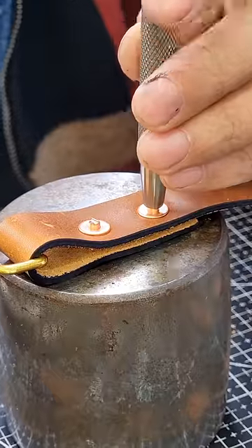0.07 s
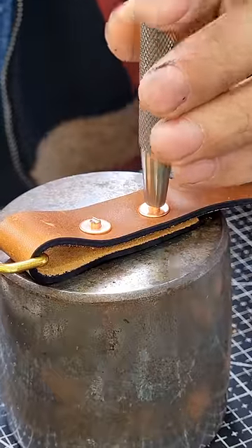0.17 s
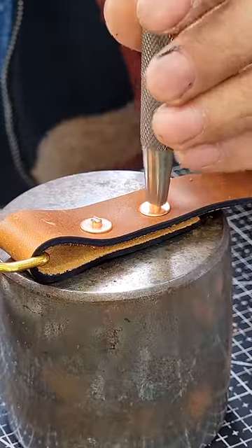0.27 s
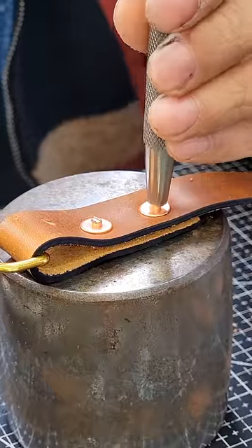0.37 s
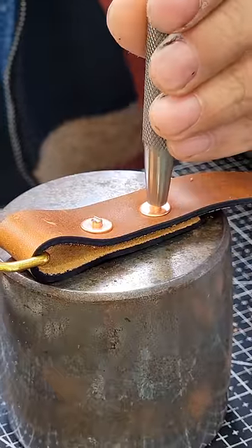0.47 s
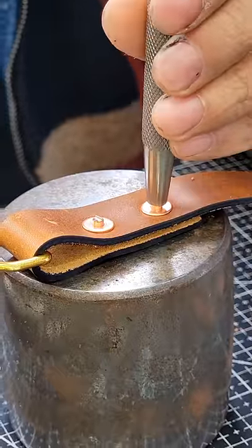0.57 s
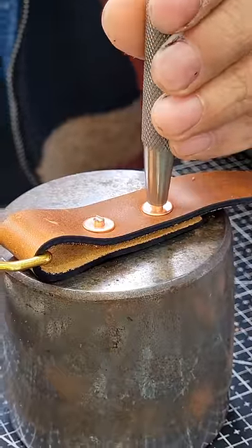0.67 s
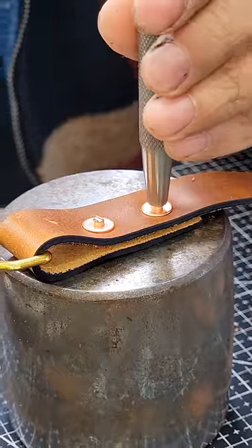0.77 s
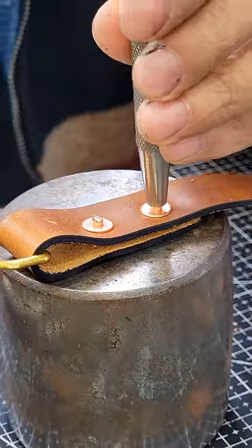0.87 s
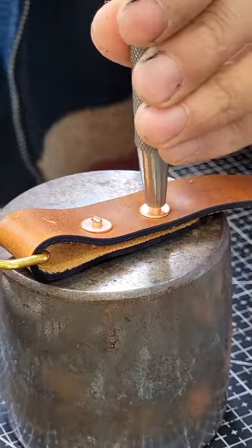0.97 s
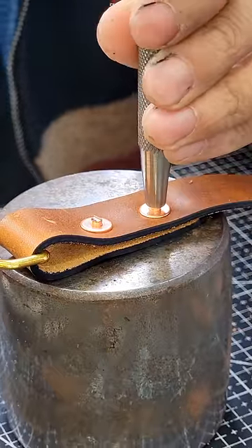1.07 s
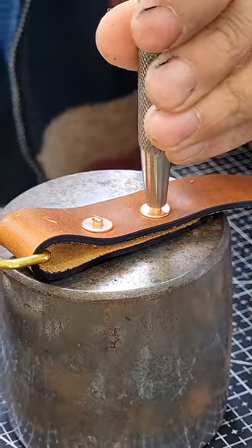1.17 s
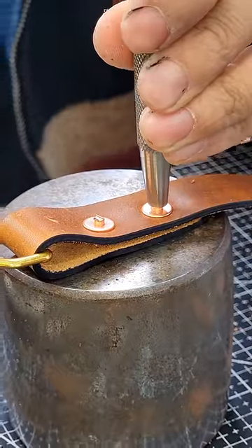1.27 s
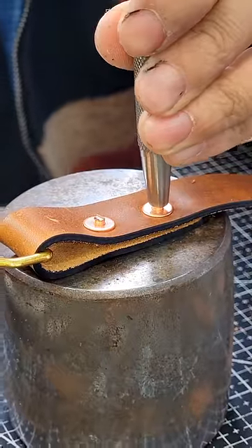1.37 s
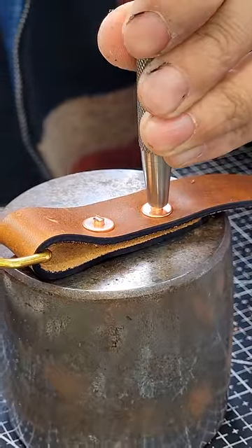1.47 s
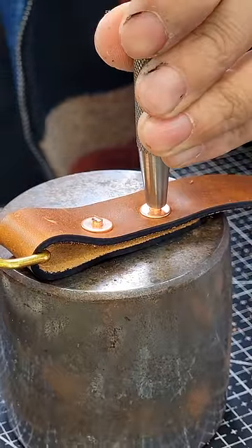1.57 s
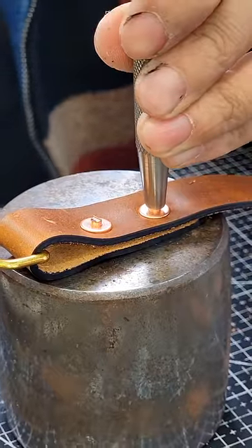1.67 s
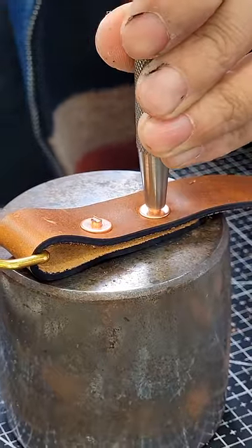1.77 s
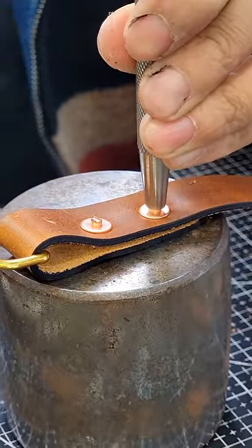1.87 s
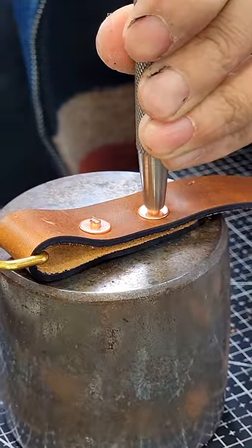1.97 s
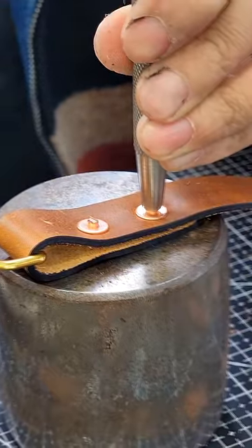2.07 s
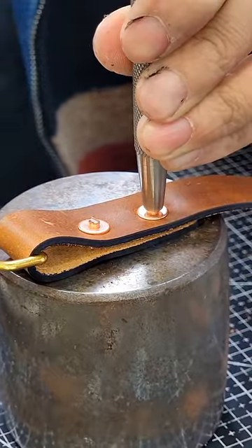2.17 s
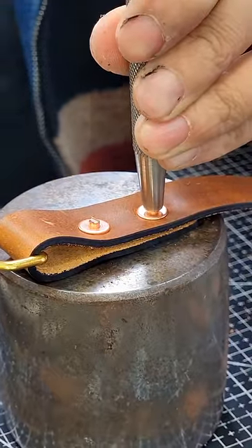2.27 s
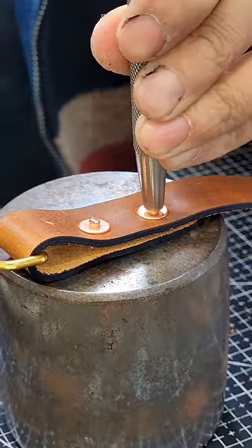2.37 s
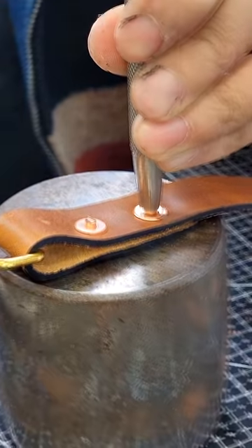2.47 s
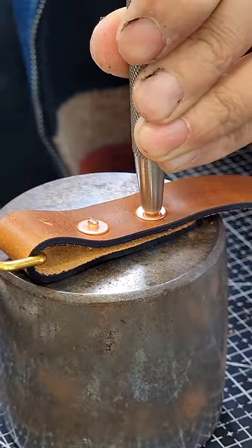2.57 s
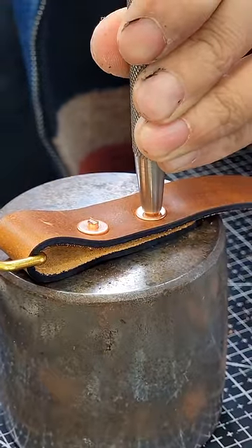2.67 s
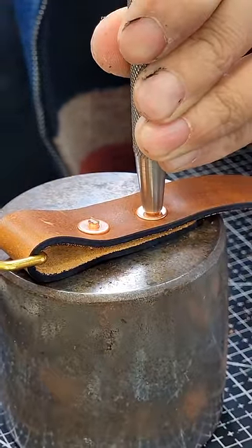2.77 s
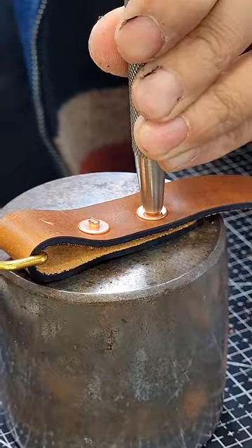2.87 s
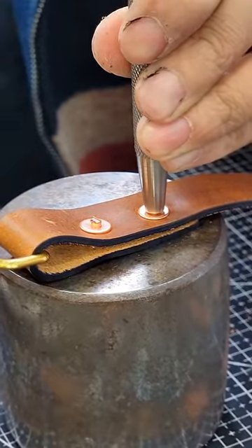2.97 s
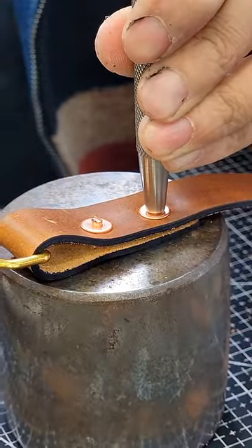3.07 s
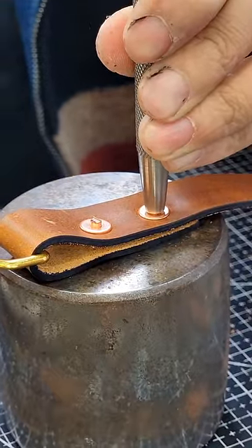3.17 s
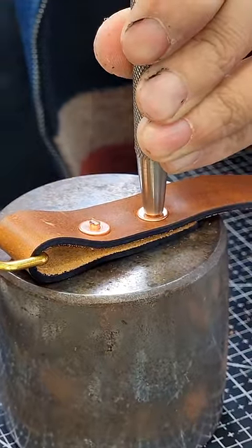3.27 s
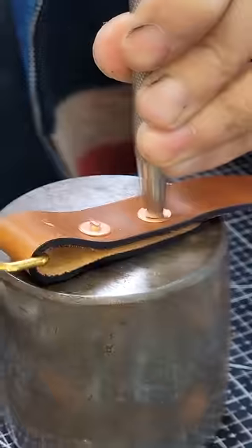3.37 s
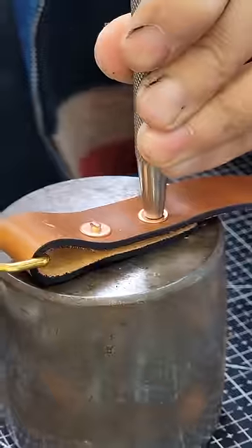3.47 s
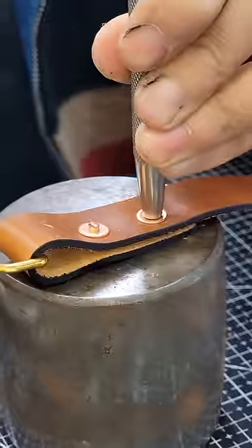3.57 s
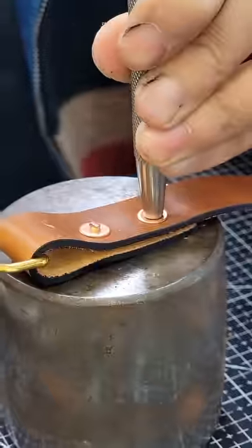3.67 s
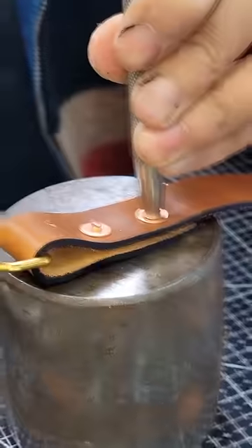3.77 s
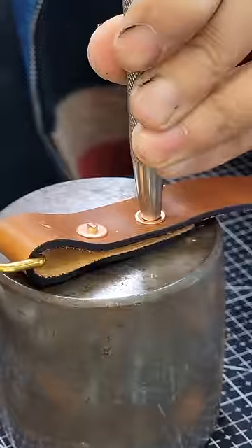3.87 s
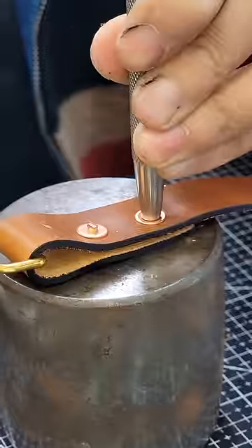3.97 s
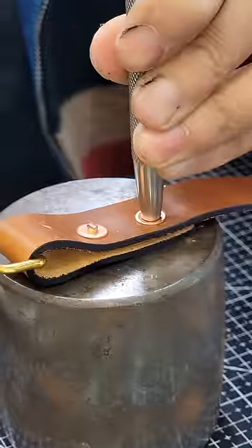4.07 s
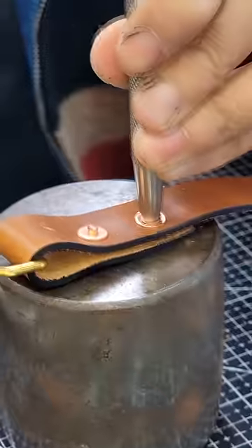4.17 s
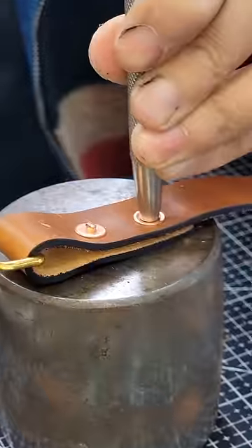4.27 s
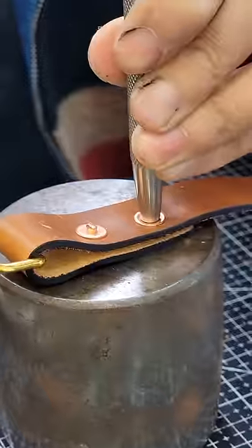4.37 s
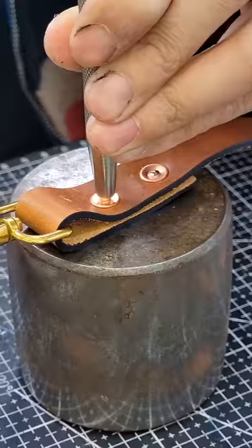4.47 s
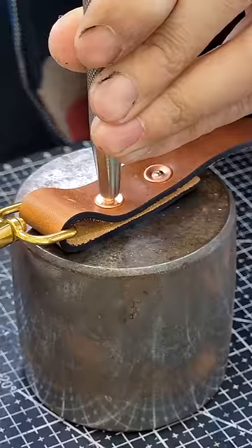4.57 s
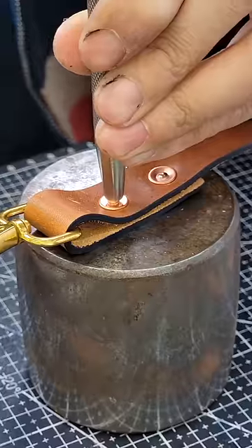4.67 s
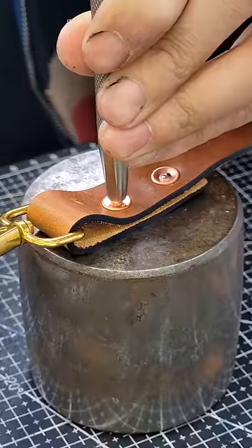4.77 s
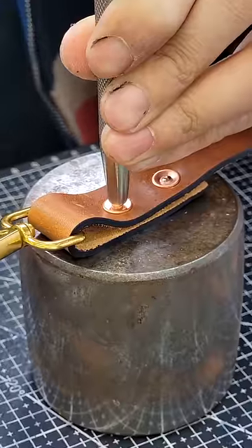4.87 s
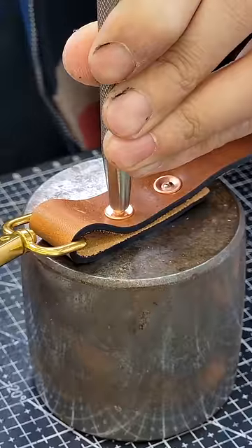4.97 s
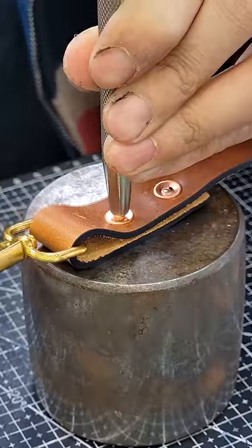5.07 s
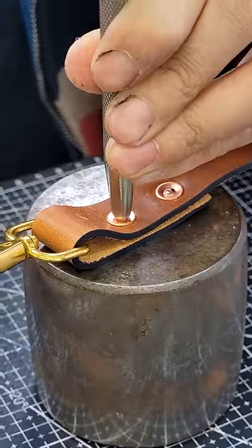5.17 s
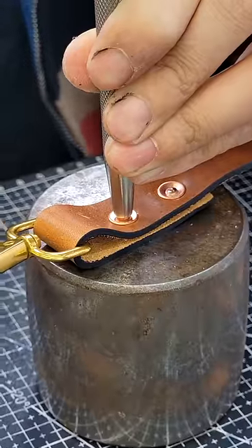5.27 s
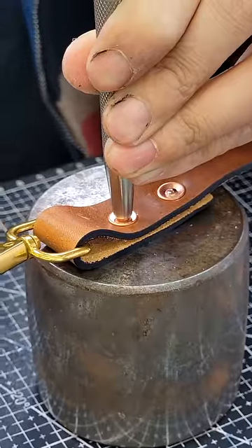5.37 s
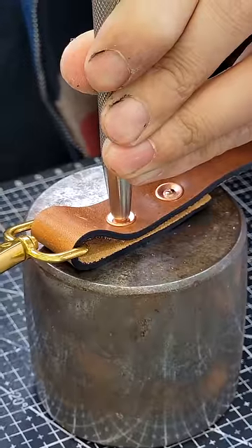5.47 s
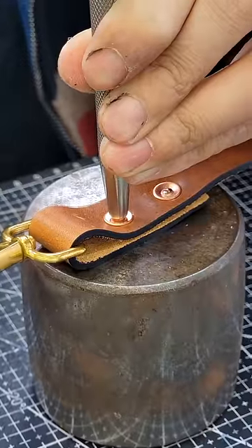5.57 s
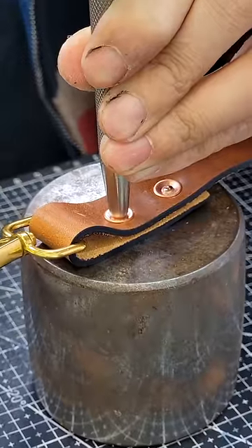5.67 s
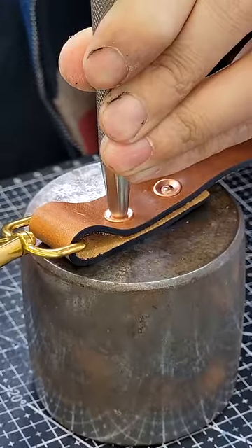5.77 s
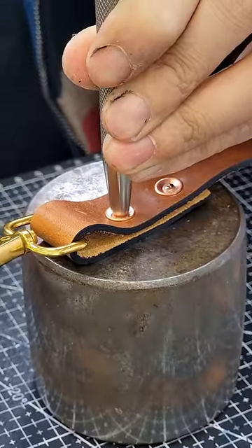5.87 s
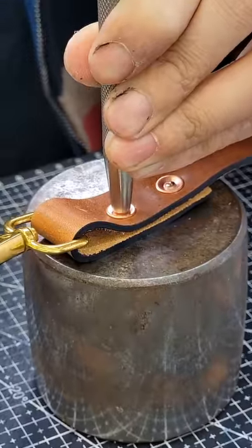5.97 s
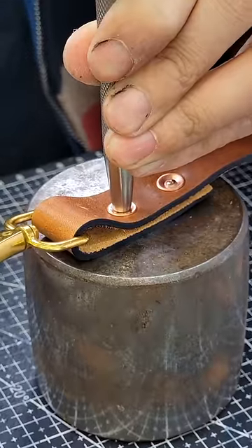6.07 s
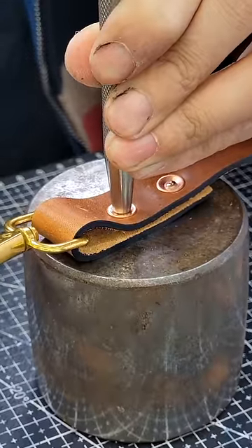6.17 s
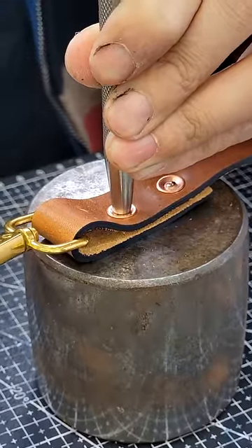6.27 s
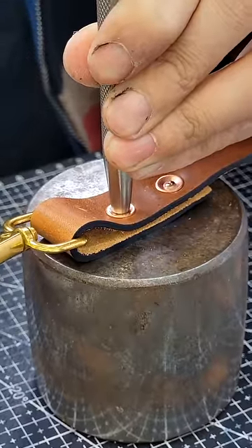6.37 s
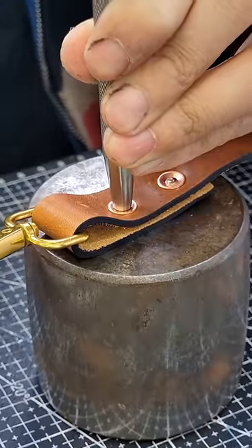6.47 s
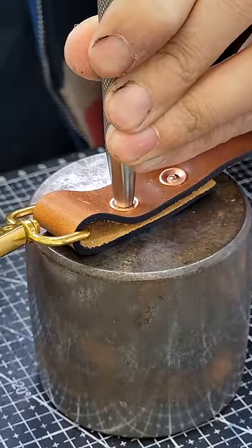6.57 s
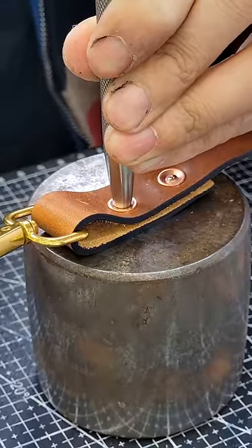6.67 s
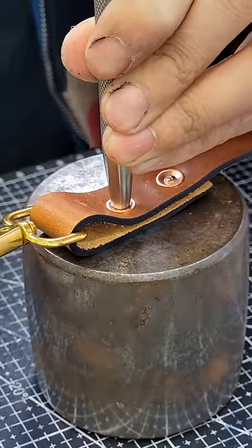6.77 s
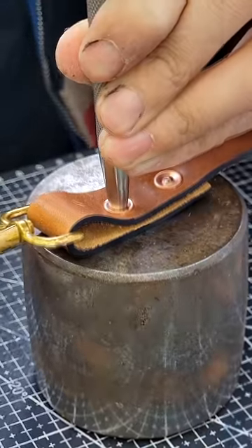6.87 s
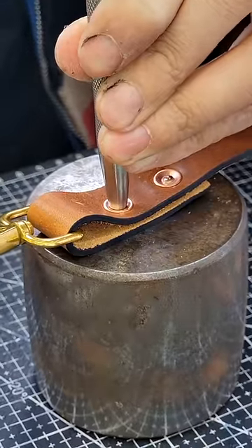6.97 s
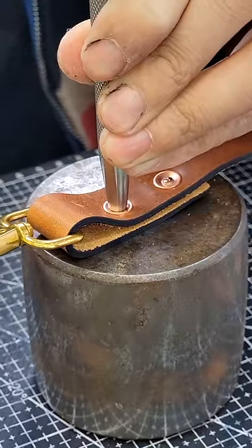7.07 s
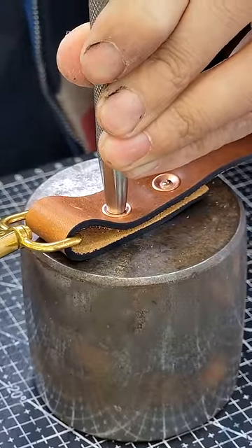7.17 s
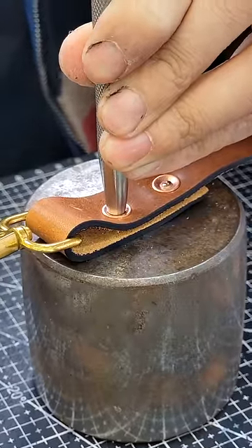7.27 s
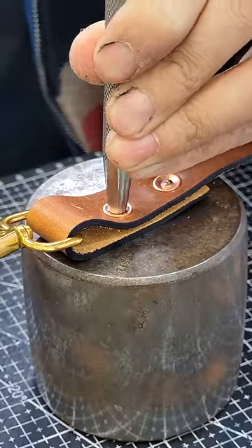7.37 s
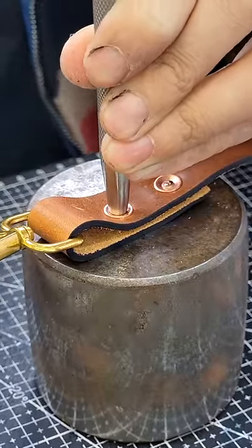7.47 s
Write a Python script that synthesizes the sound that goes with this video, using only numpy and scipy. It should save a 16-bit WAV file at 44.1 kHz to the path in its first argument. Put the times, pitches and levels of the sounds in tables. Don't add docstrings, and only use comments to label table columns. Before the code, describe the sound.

Close up in a small workshop, faint metal touches and finger rubs on leather come first. Then a hammer strikes a steel punch over a copper rivet about every half second. The first blow is a cracking, low thump softened by leather; later ones are hard, woody, metallic knocks with brief pings. Midway the sound cuts abruptly, and a new soft blow leads to more hard ones.

```python
import sys
import numpy as np
from scipy import signal
from scipy.io import wavfile
from scipy.ndimage import uniform_filter1d, map_coordinates

SR = 44100
rng = np.random.default_rng(int(sys.argv[2]) if len(sys.argv) > 2 else 0)


def boost_factor(decibels):
    exponent = np.asarray(decibels, float) / 20
    return 10 ** exponent


def master(y):
    cut = np.clip(np.atleast_2d(y).T, -1, 1)
    pcm = np.round(cut * 32767)
    wavfile.write(sys.argv[1], SR, pcm.astype(np.int16))


N = 331191
CUT_S = 4.472
HISS_DB = (-47, -41.5)

# [t/s, crack level/dB, frame thump level/dB, bench knock level/dB, rivet seating 0-1]
BLOWS = [(1.6979, -15.5, -14.5, -19.5, .22), (2.146, -21, -25, -16, .42), (2.5452, -25, -27, -13, .76),
         (3.0096, -28, -25, -12, .9), (3.4312, -28, -23.5, -13, 0.98), (3.85, -20.5, -35, -18.5, 1),
         (4.297, -25, -27.5, -13, 1), (4.752, -16, -14.5, -21.5, 0), (5.183, -18, -28, -16, 0.9),
         (5.6842, -29, -29, -14, 0.9), (6.1142, -27, -28.5, -14.5, 0.9), (6.5309, -26.5, -28, -13, .92),
         (6.9708, -23, -28, -12.5, 0.9)]
# [f/Hz, level/dB, t60/s, share ringing ahead of the blow left, the same right]
FRAME_MODES = [(48, -15, .2, .6, .6), (83, 0, .4, 1.5, 1.7), (118, -15, .1, .5, .6), (168, -8, .2, .9, .7),
               (255, -11, .05, .6, .6), (340, -14, .04, .6, .6)]
BENCH_MODES = [(274, -3.5, 0.01, 0.6, 2.9), (366, -3, 0.021, 1, 2.4), (520.8, 9.5, 0.031, 0.11, 0.2),
               (643, 0, 0.04, 0.1, 0.067), (760, -16.5, 0.029, .3, 1.5)]
BLOCK_MODES = [(903, -5, 0.04, 0.1, 0.74), (1052.4, 5.5, 0.037, .3, 0.6), (1180, -10, 0.033, 0.21, 0.18),
               (1350, -3, .035, 0.26, .9), (1380, -13, .04, 0.33, 0.32), (1780, -11, 0.074, .4, 0.66),
               (2050, -21, 0.036, .4, .6)]
ROCK_MODES = [(36, -1.5, 0.23, 0.44, .9), (56.7, -1.2, .45, 0.34, 0.42)]
# [f/Hz, level/dB per Hz]
CRACK_SPECTRUM = [(710, -31), (1200, -11), (3400, -0.5), (4050, -6.5), (5450, -8.5), (6860, -8),
                  (7660, -5.5), (14800, -10), (16500, -22.5)]


def blows():
    out, t = np.zeros((2, N)), np.arange(-SR // 20, SR // 4) / SR
    for s, crack_db, thump_db, knock_db, seat in BLOWS:
        late = t - seated((3.8, 0.93), seat) / 1000
        clack_db = seated((-51.5, -25), seat)
        hard = np.clip((knock_db - thump_db + 4.0) / 16, .12, 1)

        body = boost_factor(thump_db + 1.9) * ring(FRAME_MODES, late, hard, scatter_db=-3.27, ports_ms=0.17, turn=0.063)
        body *= np.exp(-(np.maximum(late, 0) / 0.018) ** 4)
        body *= boost_factor([[-.7], [.7]])
        knock = ring(BENCH_MODES, late + 0.00023, hard, scatter_db=1.4, ports_ms=0.13, turn=0.87)
        rock = ring(ROCK_MODES, late, hard, scatter_db=2.0, ports_ms=.4, turn=1.9)
        clack = ring(BLOCK_MODES, late + .0012, hard, scatter_db=2.5, ports_ms=0.17, turn=0.1)
        body += boost_factor(knock_db - 9.5) * knock
        body += boost_factor(knock_db - 17.5) * rock
        body += boost_factor(clack_db - 5.5) * clack

        burst = boost_factor(-60 * np.maximum(t / 0.0046, -t / 0.0036))
        burst += 0.17 * boost_factor(-60 * np.abs(t) / 0.045)
        rebound_db = -23 + rng.normal(0, 3)
        rebound_s = 0.033 + rng.normal(0, .004)
        burst += seat * boost_factor(rebound_db - 60 * np.abs(t - rebound_s) / .02)
        grit = rush(CRACK_SPECTRUM, [(1000, .05)], size=len(t), patchy_db=1.5)
        crack = boost_factor(crack_db - 5.5) * burst * grit * boost_factor([[.8], [-.8]])

        fade = np.clip((t[-1] - t) * 20, 0, 1)
        add(out, (body + crack) * fade, s + t[0])
    return out


# [low f/Hz, level/dB, high f/Hz, level/dB]
PUNCH_PINGS = [(4260, -25, 17000, -45), (6900, -22.5, 17000, -32.5), (7110, -23, 14800, -44),
               (7110, -51, 10100, -35.5), (7940, -42, 17000, -33.5), (4846, -29.5, 12500, -28),
               (4928, -30.5, 12300, -38.5), (4668, -31, 15000, -45.5), (7150, -20.5, 14800, -30.5),
               (8000, -28.5, 9760, -40.5), (3858, -40.5, 11300, -42), (4760, -32, 11000, -35.5),
               (4520, -24.5, 12000, -31.5)]


def punch():
    t60_s, ahead_t60_s, ahead_s, lead_s = .055, .06, .028, .0015
    out, t = np.zeros((2, N)), np.arange(-SR // 20, SR // 6) / SR
    shape = boost_factor(-60 * np.maximum(t / t60_s, -t / ahead_t60_s))
    shape *= np.clip((t + ahead_s) * 200, 0, 1)
    for (s, *_), (low_hz, low_db, high_hz, high_db) in zip(BLOWS, PUNCH_PINGS):
        spread = np.array([0, 1, 1, 1]) * rng.standard_normal((2, 4))
        hz = np.array([[low_hz], [high_hz]]) * (1 + 0.06 * spread)
        hz = hz.reshape(-1, 1).clip(0, 15300)
        db = np.array([[low_db - 15], [high_db - 6]]) - 5 * np.abs(spread) - 4 * (spread != 0)
        drift = np.cumsum(rng.standard_normal((2, len(hz), len(t))), 2) * .08
        tones = boost_factor(db.reshape(-1, 1)) * np.sin(2 * np.pi * hz * t + drift)
        add(out, tones.sum(1) * shape, s - lead_s + t[0])
    return out


# [f/Hz, level/dB per Hz]
RATTLE_SPECTRUM = [(15, -36.5), (25, -10), (76, 6), (246, -3), (371, -3), (510, -7.5), (715, -10.5),
                   (800, -18.5), (1000, -16), (1210, -26), (2200, -43.5), (2860, -65), (4840, -120)]
HISS_SPECTRUM = [(710, -25.5), (1200, -5), (2640, -7), (4520, -15.5), (7170, -14.5), (8730, -18.5),
                 (14800, -3), (16000, -20), (16500, -42.5)]
# [f/Hz, t60/s]
ROOM_DECAY = [(40, 0.67), (110, 0.32), (280, 0.29), (740, 0.26), (1940, 0.25), (5120, 0.32), (13500, 0.12)]
# [f/Hz, likeness]
TAIL_ALIKE = [(60, 0.83), (180, 1), (550, 0.55), (1650, 0.21), (4970, -0.22), (15000, 0.77)]


def tails():
    out, t = np.zeros((2, N)), np.arange(SR // 2) / SR
    for s, *_, seat in BLOWS:
        share = tail_share(seat)
        rattle = rush(RATTLE_SPECTRUM, TAIL_ALIKE, len(t), lambda f: share ** 1.4 * along(ROOM_DECAY, f),
                      patchy_db=2.5, tilt_db=seated((-6, 4), seat))
        rattle *= 1 - np.exp(-t / 0.014)
        hiss = rush(HISS_SPECTRUM, TAIL_ALIKE, len(t), lambda f: share * along(ROOM_DECAY, f), patchy_db=3.8)
        hiss *= boost_factor(-6 * np.exp(-t / 0.075))
        hiss *= 1 - np.exp(-t / 0.001)
        rattle_db = seated((-19, -25), seat)
        add(out, boost_factor(rattle_db - 2.5) * rattle + boost_factor(seated(HISS_DB, seat) + 3.5) * hiss, s)
    return out


# [f/Hz, level/dB, t60/s]
IRON_MODES = [(910, -5.5, 1.9), (1320, -4.5, 0.47), (1350, -2.5, 0.44), (1610, -2.5, 0.76),
              (1820, -3.5, 0.39), (1880, -12, 1.4)]


def iron():
    out, t = np.zeros((2, N)), np.arange(SR // 2) / SR
    hz, db, t60 = np.transpose(IRON_MODES)[:, :, None]
    for s, *_, seat in BLOWS:
        strengths = db + 5 * rng.standard_normal(db.shape)
        levels = boost_factor(strengths - 60 * t / (t60 * tail_share(seat)))
        song = np.sum(levels * np.sin(2 * np.pi * hz * t), 0)
        add(out, boost_factor(seated(HISS_DB, seat) - 33) * song * np.cos(np.pi * t), s)
    return out


def buckle():
    buckle_hz, hanging_db = 2810, -4
    out, t = np.zeros((2, N)), np.arange(SR // 2) / SR
    for s, *_, seat in BLOWS:
        drift = np.cumsum(rng.standard_normal((2, len(t))), 1) / 11
        shaken = np.clip((tail_share(seat) - .85) * 5, 0, 1)
        shiver = shaken * np.exp(-((t - .1) / .08) ** 2) * np.sin(2 * np.pi * buckle_hz * t + drift)
        flutter = unit(uniform_filter1d(rng.standard_normal(len(t)), size=500))
        shiver *= boost_factor(hanging_db * (s > CUT_S) + 2.5 * flutter)
        add(out, boost_factor(seated((-89.5, -61), seat)) * shiver, s)
    return out


PANEL_TONES = [81, 92, 183, 208, 230]
PANEL_LEVELS = [-65, -62.5, -72, -72, -77]


def panel():
    sag_db, unsteady_db = 9, 2
    t = np.arange(N) / SR
    drift = np.cumsum(rng.standard_normal((5, N)), 1) / 130
    tones = np.sin(2 * np.pi * np.outer(PANEL_TONES, t) + drift)
    moved = t > CUT_S
    swap_db = -sag_db * np.array([moved, ~moved, moved / 2, moved / 2, moved / 2])
    sway = [map_coordinates(knots, [np.arange(N) * 5 / SR]) for knots in rng.standard_normal((5, 60))]
    level_db = np.c_[PANEL_LEVELS] + swap_db + unsteady_db * np.array(sway)
    return stir() * np.sum(boost_factor(level_db) * tones, 0)


# [t/s, peak level/dB, f/Hz, t60/s]
TICKS = [
    (0.468, -57, 2820, 0.016),
    (1.078, -66, 2920, 0.021),
    (1.9692, -56, 3010, 0.036),
]
TAPS = [
    (1.076, -60, 519, 0.024),
    (1.172, -63, 581, 0.052),
    (1.232, -54, 580, 0.08),
    (1.784, -49.5, 569, 0.072),
    (2.034, -70.5, 1080, 0.059),
    (4.037, -61, 450, 0.037),
]
SNAPS = [
    (0.0014, -47, 8030, 0.0079),
    (0.2224, -76, 7770, 0.03),
    (0.2394, -82, 6860, 0.03),
    (1.3029, -75, 7290, 0.03),
]


def touches():
    out, t = np.zeros((2, N)), np.arange(SR // 10) / SR
    for s, db, hz, t60 in TICKS + TAPS + SNAPS:
        tone = np.sin(2 * np.pi * hz * t) + 0.19 * np.sin(2 * np.pi * .7 * hz * t)
        add(out, boost_factor(db - 60 * t / t60) * (1 - np.exp(-t / 0.0012)) * tone, s)
    return out


# [t/s, peak level/dB]
RUBS = [
    (1.175, -64),
    (1.247, -66),
]
# [f/Hz, level/dB per Hz]
SKIN_SPECTRUM = [(240, -53), (400, -26), (600, -18), (899, -26), (2590, -19.5), (12300, -36.5),
                 (15500, -36), (16500, -53.5)]


def rubs():
    rise_db_per_s, fall_db_per_s = 900, 420
    starts, peaks = np.transpose(RUBS)[:, :, None]
    since = np.arange(N) / SR - starts
    level = np.sum(boost_factor(peaks - np.maximum(fall_db_per_s * since, -rise_db_per_s * since)), 0)
    grain = boost_factor(1.7 * unit(uniform_filter1d(rng.standard_normal(N), size=90)))
    return level * unit(grain) * rush(SKIN_SPECTRUM, [(1000, 0.25)], size=N)


# [f/Hz, level/dB per Hz]
AIR_SPECTRUM = [(12, -45.5), (20, -11.5), (54, -1), (157, -14), (367, -17), (472, -25.5), (742, -25),
                (812, -34), (1500, -38), (1950, -66.5), (3300, -120)]
FIZZ_SPECTRUM = [(590, -39), (1000, 1), (1250, -4), (1410, -5.5), (2810, -2), (3080, 0), (3470, -7),
                 (7260, -10), (8460, -21.5), (15000, -14), (16500, -24.5)]
# [f/Hz, likeness]
AIR_ALIKE = [(60, 0.81), (240, 0.93), (950, 0.089), (3770, 0.045), (15000, 0.03)]


def workshop():
    rumble_db, rumble_stirred_db, fizz_db, fizz_ducked_db = -68.5, 1.1, -83, -9.5
    swell = map_coordinates(rng.standard_normal(80), [np.arange(N) * 7 / SR])
    stirred = uniform_filter1d(stir(), size=2000)
    rumble = rush(AIR_SPECTRUM, AIR_ALIKE, size=N) * boost_factor([[-1.3], [1.3]])
    rumble *= boost_factor(rumble_db + rumble_stirred_db * stirred + 2.0 * swell)
    fizz = rush(FIZZ_SPECTRUM, AIR_ALIKE, size=N)
    return rumble + boost_factor(fizz_db + fizz_ducked_db * stirred) * fizz


def stir():
    ebb_s = 1.6
    out, t = np.zeros((1, N)), np.arange(3 * SR) / SR
    for s, *_, seat in BLOWS:
        add(out, seat ** 2 * np.exp(-t / ebb_s)[None] * (1 - np.exp(-t / .05)), s)
    return np.tanh(out[0])


def seated(ends, seat):
    return ends[0] + (ends[1] - ends[0]) * seat


def tail_share(seat):
    return min(seated((0.72, 1.38), seat), 1.118)


def ring(modes, t, hard, scatter_db, ports_ms, turn):
    hz, db, t60, *lead = np.transpose(modes)[:, :, None]
    t = t + np.reshape([ports_ms, -ports_ms], (2, 1, 1)) / 2000
    hz = hz * (1 + rng.standard_normal(hz.shape) / 100)
    level = boost_factor(db + scatter_db * rng.standard_normal(db.shape))
    tones = level * np.cos(2 * np.pi * hz * t - turn)
    struck = (1 + np.tanh(t * hz * 6)) / 2
    after = boost_factor(-60 * np.abs(t) / t60)
    ahead = hard * np.array(lead) * np.cos(np.pi / 2 * np.clip(-t / 0.033, 0, 1)) ** 2
    ahead = ahead * boost_factor(-60 * np.abs(t) / 0.084 * (hz / 400) ** 0.82)
    return np.sum(tones * (struck * after + (1 - struck) * ahead), 1)


def rush(spectrum, alike, size, decay=None, patchy_db=0, tilt_db=0):
    hz, t, z = signal.stft(rng.standard_normal((2, size)), SR, nperseg=1024, noverlap=896)
    turn = np.arccos(np.clip(along(alike, hz), -1, 1)) / 2
    gain = boost_factor(along(spectrum, hz) + tilt_db * np.log2(1 + hz / 100))
    gain = gain * np.array([np.cos(turn), np.sin(turn)])
    z = z * (gain / np.sqrt(np.mean(gain ** 2) * 2))[..., None]
    field = uniform_filter1d(rng.standard_normal(z.shape[1:]), size=9, axis=0)
    field = uniform_filter1d(field, size=8, axis=1)
    z = z * boost_factor(patchy_db * unit(field) - patchy_db ** 2 / 78.0)
    if decay is not None:
        z = z * boost_factor(-60 * t / decay(hz)[:, None])
    mid, side = signal.istft(z, SR, nperseg=1024, noverlap=896)[1][:, :size]
    return np.array([mid + side, mid - side])


def add(track, x, s):
    start = round(s * SR)
    x = x[..., :N - start]
    if s < CUT_S:
        left = CUT_S - s - np.arange(x.shape[-1]) / SR
        x = x * np.clip(left / .003, 0, 1)
    track[:, start:start + x.shape[-1]] += x


def unit(x):
    return x / np.sqrt(np.mean(x ** 2) + 1e-20)


def along(points, hz):
    f, v = np.transpose(points)
    return np.interp(np.log(hz + 1), np.log(f + 1), v)


def scene():
    return blows() + punch() + tails() + iron() + buckle() + panel() + touches() + rubs() + workshop()


def low_pass(x):
    return signal.sosfilt(signal.butter(12, 16810, fs=SR, output="sos"), x)


def record(dry):
    z = signal.stft(dry, nperseg=1536, noverlap=1152)[2]
    jagged = unit(uniform_filter1d(rng.standard_normal(z.shape), size=6, axis=2))
    treble = np.clip(np.linspace(0, 1, z.shape[1]) / 0.033, .2, 1)[:, None]
    x = signal.istft(z * boost_factor(2.6 * treble * jagged), nperseg=1536, noverlap=1152)[1][:, :N]
    x = x + boost_factor(-95.5) * rng.standard_normal(x.shape)
    x = x / (1 + np.abs(x / .325) ** 6) ** (1 / 6)
    x = signal.sosfiltfilt(signal.butter(12, 16500, fs=SR, output="sos"), x)
    return low_pass(x)


dry = scene()
out = record(dry)
master(out)
```